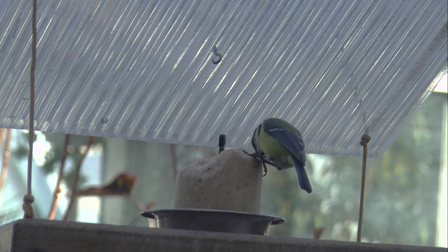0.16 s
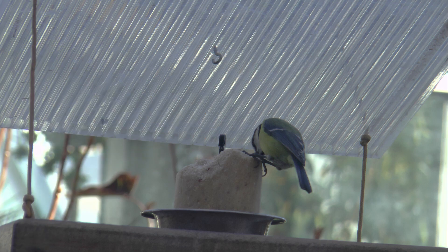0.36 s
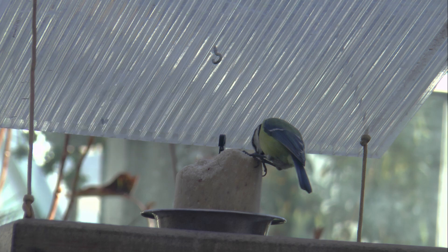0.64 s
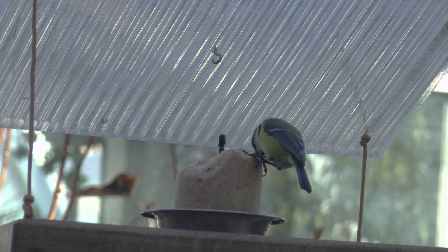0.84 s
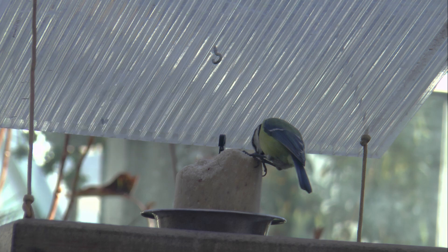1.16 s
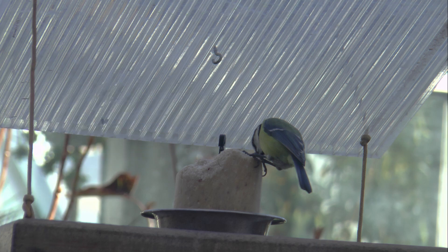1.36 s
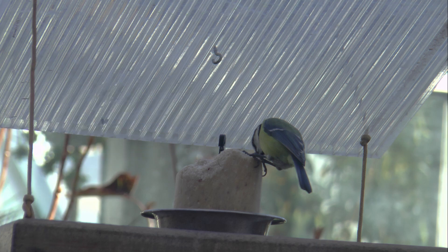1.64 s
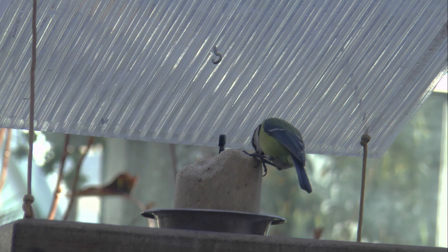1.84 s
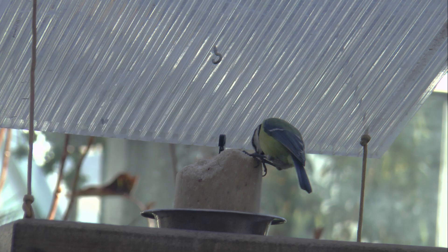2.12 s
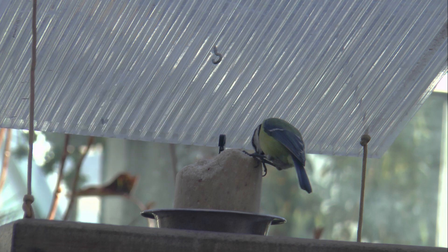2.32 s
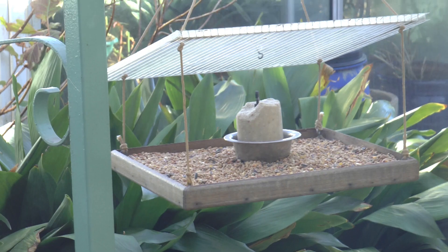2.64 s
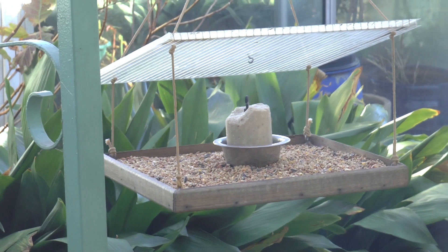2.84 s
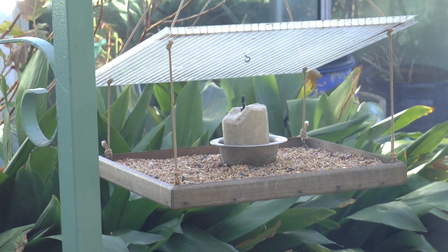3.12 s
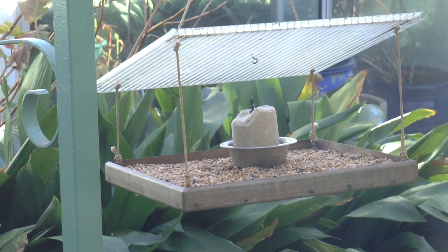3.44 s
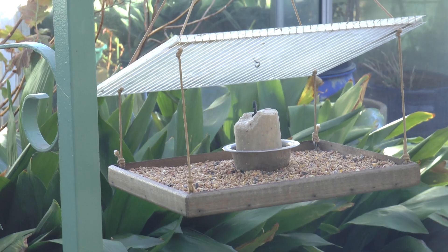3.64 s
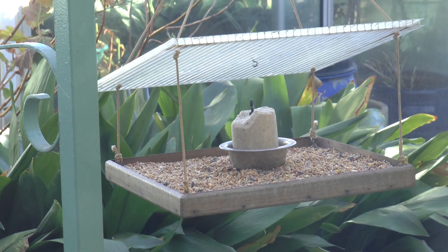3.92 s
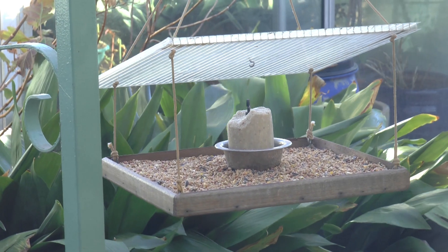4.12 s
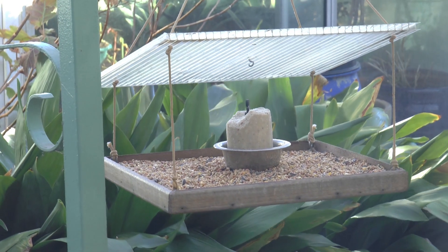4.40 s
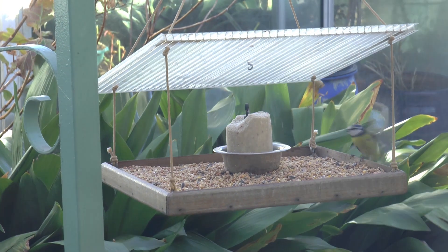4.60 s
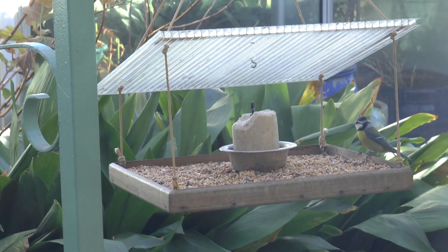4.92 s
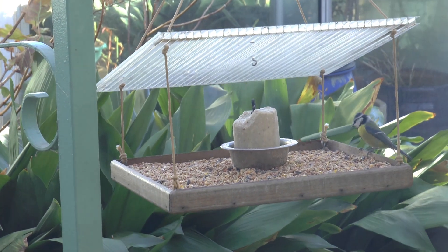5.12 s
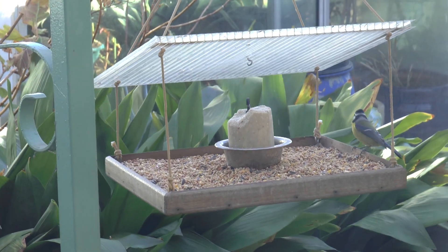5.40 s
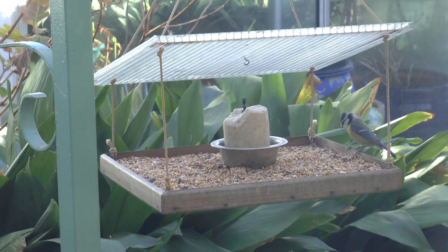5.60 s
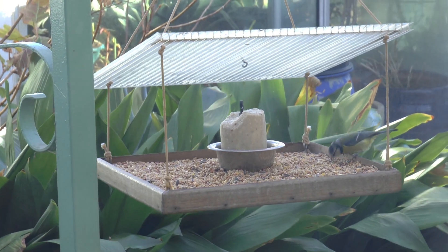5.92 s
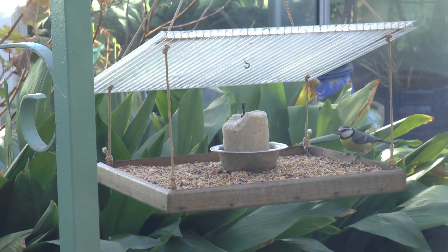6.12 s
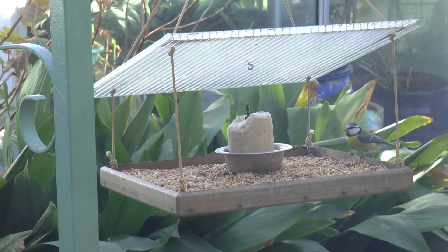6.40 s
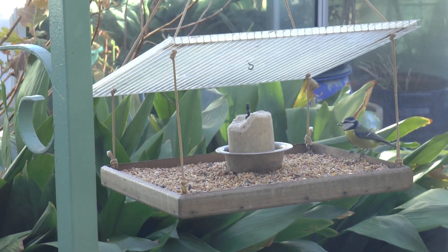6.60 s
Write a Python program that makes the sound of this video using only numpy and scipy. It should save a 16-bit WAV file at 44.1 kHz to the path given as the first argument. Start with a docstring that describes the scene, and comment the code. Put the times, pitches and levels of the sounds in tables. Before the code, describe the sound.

Close outdoor bird song over a very quiet, soft garden hiss. Three times, pure thin whistles lead to two quick falling notes and a fast, slightly lower trill that sinks in pitch, slows and generally weakens. Tiny distant chirps and peeps fill the gaps. Near echoes and a faint leafy tail follow the notes, with a barely audible crackle clinging to them; the last song stops mid-trill.

```python
"""A blue tit sings close by in a quiet garden, three songs over a still air noise and far twitter.
Each song starts with thin high whistles, then two down-slurred notes, then a fast trill that slows and sinks.
Every note is a near-pure tone of the syrinx, a phase-integrated sine; slurs open with both sides sounding.
Echoes, a foliage tail, a noise haze and a faint crackle follow the notes.
Far birds, short gliding tones, call mostly in the pauses between songs."""
import sys
import numpy as np
from scipy import signal
from scipy.fft import rfft, irfft
from scipy.io import wavfile
from scipy.ndimage import uniform_filter1d, minimum_filter1d

SR = 44100
rng = np.random.default_rng(int(sys.argv[2]) if len(sys.argv) > 2 else 0)


def file_out(sig):
    """Save sig as 16-bit WAV at sys.argv[1]."""
    # one column per channel
    cols = np.atleast_2d(sig).T
    # limit, then scale
    lim = np.clip(cols, -1, 1)
    pcm = np.round(lim * 32767).astype(np.int16)
    wavfile.write(sys.argv[1], SR, pcm)


N = 297675
TIME = np.arange(N) / SR


def from_db(db):
    """Logarithmic level: decibels to amplitude gain."""
    return 10 ** (np.asarray(db) / 20)


def rms_one(x):
    """Power normalisation: scale to rms 1."""
    return x / np.sqrt(np.mean(x ** 2) + 1e-20)


def drift(rate_hz, size):
    """Band-limited randomness: low-passed noise wavers up to the given rate, with spread 1."""
    sos = signal.butter(4, rate_hz, fs=SR, output="sos")
    settling = SR // 10
    noise = rng.standard_normal(size + settling)
    return rms_one(signal.sosfilt(sos, noise))[-size:]


def coloured(x, spectrum):
    """Linear filtering: weight the Fourier spectrum by (f/Hz, level/dB) points; rms 1."""
    hz, db = np.transpose(spectrum)
    bins = np.maximum(np.fft.rfftfreq(N, 1 / SR), 1)
    weight = from_db(np.interp(np.log(bins), np.log(hz), db))
    return rms_one(irfft(rfft(x) * weight, N))


def loudness_of(song):
    """Energy averaging: running rms of the song over about 9 ms."""
    return np.sqrt(np.abs(uniform_filter1d(song ** 2, size=400)))


def foliage(x, t60, build=0.0062):
    """Diffuse scattering from leaves and fences: a dense tail builds up and decays 60 dB in t60 seconds."""
    t = TIME[:SR]
    envelope = from_db(-60 * t / t60) * (1 - np.exp(-t / build))
    tail = rng.standard_normal(SR) * envelope
    return signal.fftconvolve(x, tail / np.linalg.norm(tail))[:N]


def add(out, gesture, jitter, jitter_hz, shimmer_db, attack=0.0045, release=0.003,
        droop=0.066, scoop=0, overtone_db=-70):
    """Phase integration: one side of the syrinx follows (t/s, f/Hz, level/dB) points.

    Pitch scoops up as pressure builds and sags as it is let go; attack and release are in seconds."""
    s, hz, db = np.transpose(gesture)
    span = (TIME > s[0] - attack) & (TIME < s[-1] + release)
    t = TIME[span]
    opening = np.clip((t - s[0]) / attack + 1, 0, 1)
    closing = np.clip((t - s[-1]) / release, 0, 1)
    bend = (1 - scoop * (1 - opening) ** 2) * (1 - droop * closing ** 2)
    # muscles round off the corners of a gesture
    glide = uniform_filter1d(np.interp(t, s, hz), size=220, mode="nearest")
    frequency = glide * bend * (1 + jitter * drift(jitter_hz, len(t)))
    phase = 2 * np.pi * np.cumsum(frequency) / SR
    level = from_db(np.interp(t, s, db) + shimmer_db * drift(jitter_hz, len(t)))
    gate = (np.sin(np.pi / 2 * opening) * np.cos(np.pi / 2 * closing)) ** 2
    tone = np.sin(phase) + from_db(overtone_db) * np.sin(2 * phase)
    out[span] += np.sqrt(2) * level * gate * tone


def garden_air(level_db=-56, waver_db=1.5):
    """Stationary broadband noise: the still garden, its level wavering slightly."""
    # spectrum of the garden background: f/Hz, relative level per Hz/dB
    garden_spectrum = [(300, -40), (600, -21), (850, -1.5), (1200, -3), (2000, -4.5), (2700, -7),
                       (4100, -3.5), (5500, -7.5), (7500, -17.5), (10000, -40.5), (15000, -49.5)]
    level = from_db(level_db + waver_db * drift(12, N))
    return level * coloured(rng.standard_normal(N), garden_spectrum)


def far_birds(chatter_db=-63, count=130):
    """Gliding sinusoids: short runs of thin notes from across the gardens, over a random farther twitter."""
    # calls before the far path: start t/s, notes, note length t/s, start f/Hz, slide f/Hz, level/dB
    far_calls = [(1.989, 3, .065, 5930, -450, -57), (2.421, 1, .13, 5450, -180, -59.5),
                 (2.413, 1, 0.31, 3476, -400, -60.5), (4.706, 2, 0.037, 5740, 501, -55),
                 (4.804, 4, 0.062, 6050, -380, -55.5), (5.44, 1, 0.17, 2820, 40, -62),
                 (5.639, 1, 0.17, 3780, 69, -53), (5.852, 1, .034, 3090, -180, -44.5),
                 (5.967, 2, 0.089, 2960, 117, -51)]
    gap_s, step = 0.1, 0.36  # note to note; share of its slide by which each note moves the next
    out = np.zeros(N)
    for start, notes, length, start_hz, slide_hz, db in far_calls:
        for k in range(round(notes)):
            onset = start + k * gap_s
            hz = start_hz + k * step * slide_hz
            add(out, [(onset, hz, db), (onset + length, hz + slide_hz, db)],
                jitter=.012, jitter_hz=90, shimmer_db=5.0, attack=0.0089, release=0.009)
    for when, start, end in rng.random((count, 3)):
        onset = when * (TIME[-1] - .1)
        hz = 3500 + 1200 * start
        end_hz = hz + 700 * (end - .5)
        add(out, [(onset, hz, chatter_db), (onset + 0.038, end_hz, chatter_db)],
            jitter=0.041, jitter_hz=121, shimmer_db=7.0, attack=0.013, release=0.014)
    return out


def airy_haze(lower_notes, level_db=-39.0, flutter_db=4):
    """Envelope-modulated noise: a fluttering haze hangs on behind the slurs and the trill."""
    # spectrum of the haze: f/Hz, relative level per Hz/dB
    haze_spectrum = [(500, -40.5), (2000, -14), (3100, -5.5), (3700, -8.5), (4700, -1), (5800, -8),
                     (6800, -15), (8300, -15), (10000, -29.5), (15000, -37.5)]
    airy = coloured(rng.standard_normal(N), haze_spectrum) * np.sqrt(loudness_of(lower_notes))
    return from_db(level_db + flutter_db * drift(32, N)) * foliage(airy, t60=0.27)


def crackle(song, hiss_db=-46, crackle_db=-34, size_spread_db=3):
    """Amplitude modulation: evenly spaced ticks and a faint hiss rise and fall with the notes' loudness."""
    # spectra of the hiss and of the ticks: f/Hz, relative level per Hz/dB
    hiss_spectrum = [(30, -9.5), (500, -2.5), (1200, 2.5), (3200, -1.5), (5500, -15.5), (8000, -3.5),
                     (15000, -8.5)]
    tick_spectrum = [(30, 0), (1000, 3), (4000, 0), (9000, 0), (15000, -1.5), (15600, -17)]
    first_tick_s, tick_gap_s = .0221, .02322
    at = (np.arange(first_tick_s, TIME[-1], tick_gap_s) * SR).astype(int)
    ticks = np.zeros(N)
    sizes = from_db(size_spread_db * rng.standard_normal(len(at)))
    ticks[at] = sizes * rng.choice([-1, 1], len(at))
    loudness = loudness_of(song)
    hiss = coloured(rng.standard_normal(N), hiss_spectrum) * np.sqrt(loudness)
    return from_db(hiss_db) * hiss + from_db(crackle_db) * coloured(ticks, tick_spectrum) * loudness


def near_echoes(song):
    """Specular reflection: near surfaces return delayed, weaker copies of the song."""
    # reflections: delay t/s, level/dB
    reflections = [(.0052, -24), (.0083, -18.5), (0.012, -24)]
    return sum(from_db(db) * np.interp(TIME - delay, TIME, song, left=0) for delay, db in reflections)


def whistles(attack=0.0092, flick_s=0.018, fade_db=-0.6):
    """Frequency glide: each high tone flicks upward, sinks to a held pitch while swelling, then sags."""
    # thin whistles: start t/s, length t/s, start f/Hz, held f/Hz, end f/Hz, share of the note spent sinking,
    # start level/dB, full level/dB, opening flick (0-1)
    whistle_notes = [(-.12, 0.18, 7500, 7320, 7170, .4, -18, -12, 0.3),
                     (2.494, 0.29, 7850, 7167, 7030, .43, -32.5, -11, 0.11),
                     (2.882, 0.1755, 7444, 7230, 7050, .42, -17.5, -8, 0.08),
                     (5.678, 0.18, 7580, 7106, 6990, 0.72, -25, -9, 0.66)]
    held_until, swell_share = .68, 0.55  # shares of a whistle: end of the held pitch, end of the swell
    out, along = np.zeros(N), np.linspace(0, 1, 50)
    for start, length, start_hz, held_hz, end_hz, sinking, start_db, full_db, flick in whistle_notes:
        hz = np.interp(along, [0, min(sinking, held_until), held_until, 1],
                       [start_hz, held_hz, held_hz, end_hz])
        db = np.interp(along, [0, swell_share, 1], [start_db, full_db, full_db + fade_db])
        add(out, np.transpose([start + length * along, hz, db]),
            jitter=0.0032, jitter_hz=219.4, shimmer_db=0.73,
            attack=attack + flick_s * flick, release=0.0066, droop=.075, scoop=flick)
    return out


def slurs(rise=.028, lead=0.0064, foot_hz=3620, foot_db=-31, crest_db=-6.5, knee_db=-4, upper_db=-15):
    """Two coupled sources sweep up; the upper drops out at the crest and the lower glides down alone."""
    # slurred notes: crest t/s, end t/s, crest f/Hz, middle f/Hz, end f/Hz,
    # early level/dB, late level/dB, end level/dB
    slurred_notes = [(0.214, 0.32, 6060, 5594, 5216, -2.5, -16, -8),
                     (0.439, 0.521, 6110, 5760, 4980, 1.5, -6.5, -3),
                     (3.2, 3.31, 6090, 5660, 5200, 0, -11, -17.5),
                     (3.422, 3.512, 6016, 5610, 5040, -1.5, -7, -7.5),
                     (5.992, 6.085, 5735, 5634, 5246, -10, -14, -3),
                     (6.195, 6.282, 5910, 5640, 4960, -8.5, 1, -8.5)]
    out = np.zeros(N)
    along = np.array([0, .4, .75, 1])  # crest, early, late and end, as shares of the fall
    for crest, end, crest_hz, middle_hz, end_hz, *levels in slurred_notes:
        start = crest - rise
        knee_hz = crest_hz - (crest_hz - foot_hz) / 3
        climb = [(start, foot_hz, foot_db), (crest - rise / 3, knee_hz, crest_db + knee_db)]
        fall_hz = np.interp(along, [0, .5, 1], [crest_hz, middle_hz, end_hz])
        fall = zip(crest + along * (end - crest), fall_hz, [crest_db, *levels])
        add(out, climb + list(fall), jitter=0.0058, jitter_hz=300, shimmer_db=0.0, release=.004, droop=0.16)
        upper = [(start - lead, 4100, -34), (crest - .02, 5100, upper_db - 0.5),
                 (crest - .01, 5850, upper_db), (crest - .003, 6300, -27)]
        add(out, upper, jitter=0.022, jitter_hz=603, shimmer_db=4.0)
        # the two voices couple, which throws a weak rough tone above them
        rough = [(start, 5650, -29), (crest - rise / 2, 6100, -27)]
        add(out, rough, jitter=0.05, jitter_hz=610, shimmer_db=3.5)
    return out


def trill_notes():
    """Quadratic slowing as the breath runs out: yields onset t/s, f/Hz, level/dB of every trill note."""
    # trills: start t/s, notes, first gap t/s, last gap t/s
    trill_timing = [(.560, 17, .0738, .0805), (3.555, 13, .0723, .0819), (6.331, 6, .075, .0775)]
    # sinking course of each trill, before the gesture of its notes: t/s, f/Hz, level/dB
    trill_courses = [
        [(.56, 4537, -6.5), (.71, 4370, -6.5), (.86, 4280, -9.5), (1.08, 4285, -10), (1.3, 4167, -11),
         (1.384, 4233, -12), (1.465, 4196, -12.5), (1.69, 4136, -11.2), (1.78, 4047, -13.5)],
        [(3.555, 4550, -10.5), (3.63, 4377, -9), (3.85, 4312, -7), (4.144, 4177, -10.5), (4.225, 4143, -8),
         (4.381, 4090, -13), (4.467, 3947, -17.4)],
        [(6.33, 4580, -9), (6.48, 4465, -11), (6.63, 4310, -8), (6.71, 4275, -10)],
    ]
    for (start, count, first_gap, last_gap), course in zip(trill_timing, trill_courses):
        gaps = first_gap + (last_gap - first_gap) * np.linspace(0, 1, count - 1) ** 2
        s, hz, db = np.transpose(course)
        for onset in start + np.cumsum([0, *gaps]):
            yield onset, np.interp(onset, s, hz), np.interp(onset, s, db)


def trill(dip_spread=.3, swell_spread_db=.7, rasp_db=-28):
    """Repeated frequency and amplitude modulation: a varied swelling gesture about thirteen times a second."""
    # gesture of every trill note: t/s from onset, pitch ratio, level/dB added to the course
    note_gesture = [(0, 1.06, -25), (.006, 1.008, -15), (.014, 1.0, -6.5), (.022, .983, -1.3),
                    (.032, 1.016, 1.3), (.039, .992, -3), (.043, .96, -18)]
    out = np.zeros(N)
    s, ratio, swell_db = np.transpose(note_gesture)
    for onset, hz, db in trill_notes():
        bend = 1 + (ratio - 1) * (1 + dip_spread * rng.standard_normal(len(s)))
        level = db + swell_db + swell_spread_db * rng.standard_normal(len(s))
        add(out, np.transpose([onset + s, hz * bend, level]),
            jitter=0.0026, jitter_hz=223, shimmer_db=1.0,
            attack=0.0011, release=0.0025, droop=0.12, overtone_db=-46.5)
        # the membranes flutter for an instant before they settle on the note
        rasp = [(onset + 0.0029, hz * 1.06, db + rasp_db), (onset + .008, hz * 1.005, db + rasp_db - 5)]
        add(out, rasp, jitter=0.073, jitter_hz=592.3, shimmer_db=5.0, attack=0.0047, release=0.006)
    return out


def scene():
    """Superposition: the still garden, the far birds and the near bird with its echoes and tail."""
    lower_notes = slurs() + trill()
    song = whistles() + lower_notes
    tail = from_db(-33) * foliage(song, t60=0.41) + from_db(-34.5) * foliage(song, t60=0.98)
    far_direct = far_birds()
    far = from_db(-4.5) * far_direct + from_db(-5.0) * foliage(far_direct, t60=0.45)
    near = song + near_echoes(song) + tail + airy_haze(lower_notes) + crackle(song)
    return (near + far + garden_air())[None]


def record(dry):
    """Gain reduction, then band-limiting: a fast limiter eases peaks above 1.02; the top is cut."""
    ceiling, cutoff_hz = 1.02, 15500
    allowed = ceiling / np.maximum(np.abs(dry), ceiling)
    # about 2 ms of hold, then smoothing over the same time
    gain = uniform_filter1d(minimum_filter1d(allowed, size=89), size=89)
    low_pass = signal.ellip(10, .1, 80, cutoff_hz, fs=SR, output="sos")
    return signal.sosfilt(low_pass, dry * gain)


dry = scene()
out = record(dry)
file_out(out)
```